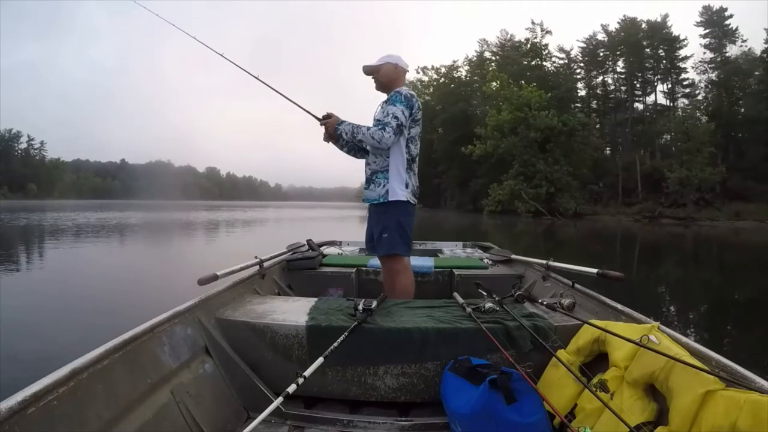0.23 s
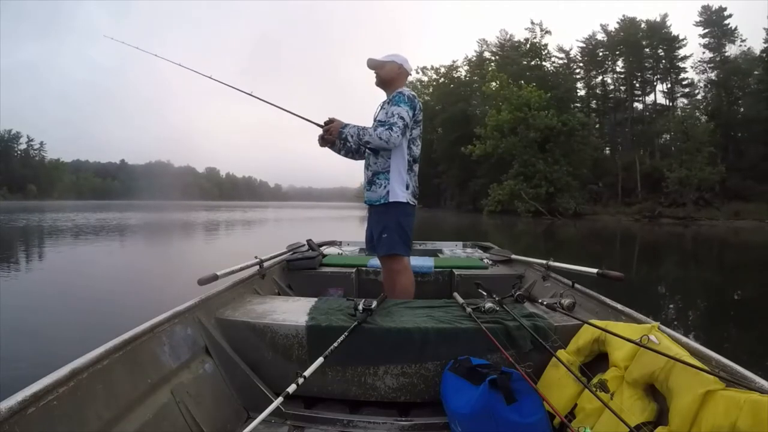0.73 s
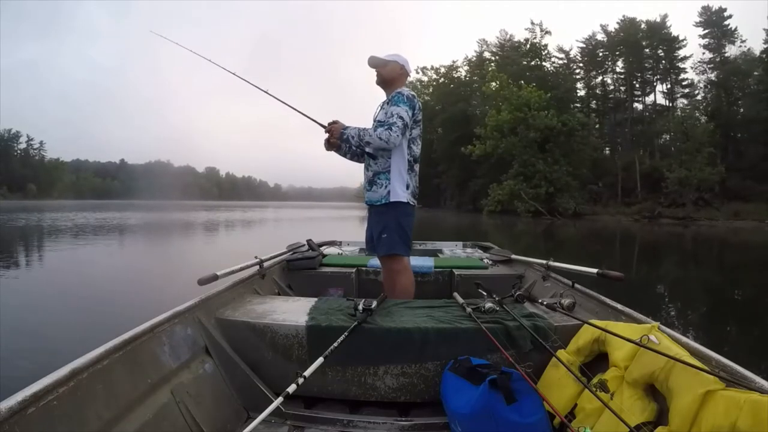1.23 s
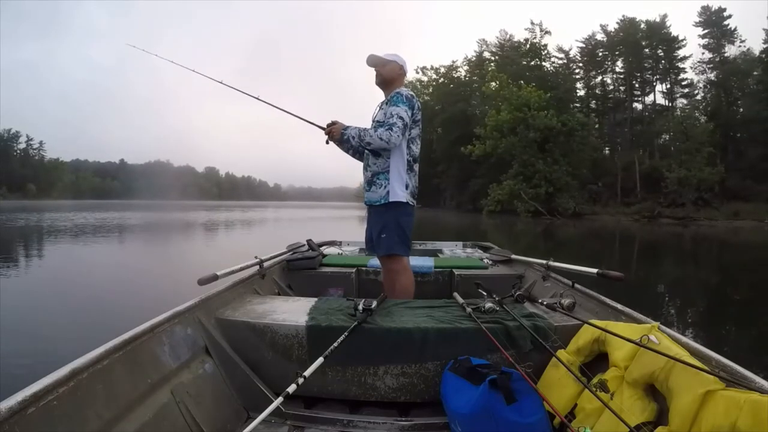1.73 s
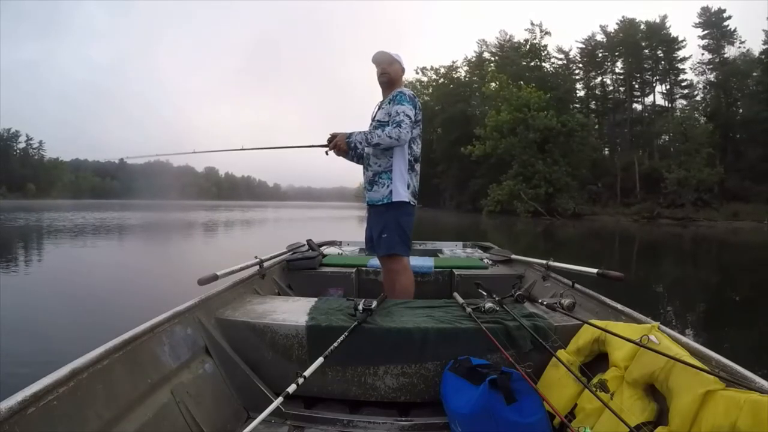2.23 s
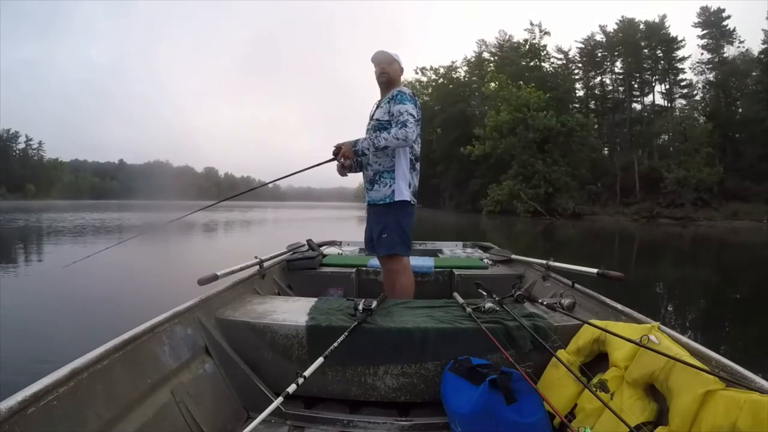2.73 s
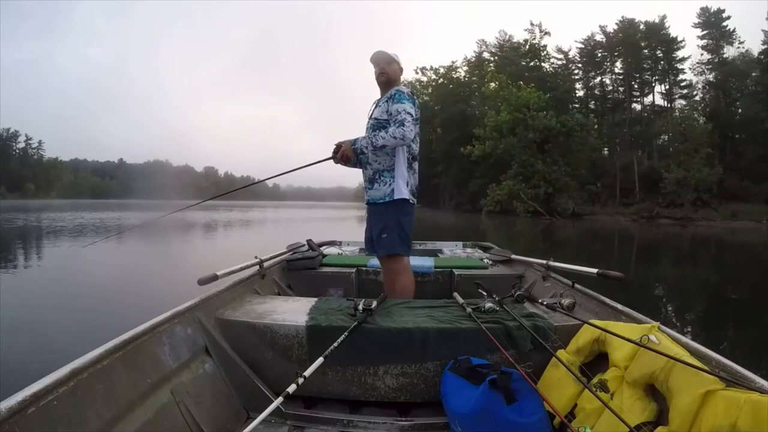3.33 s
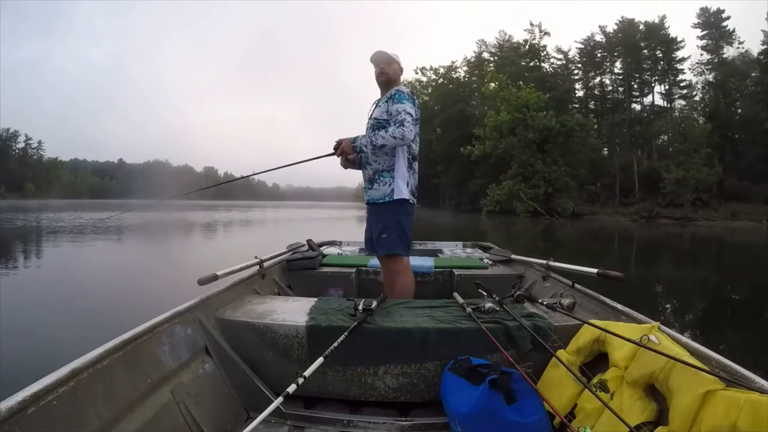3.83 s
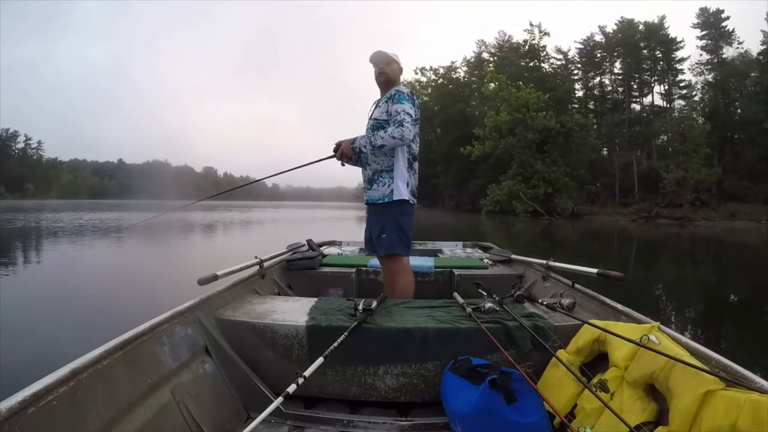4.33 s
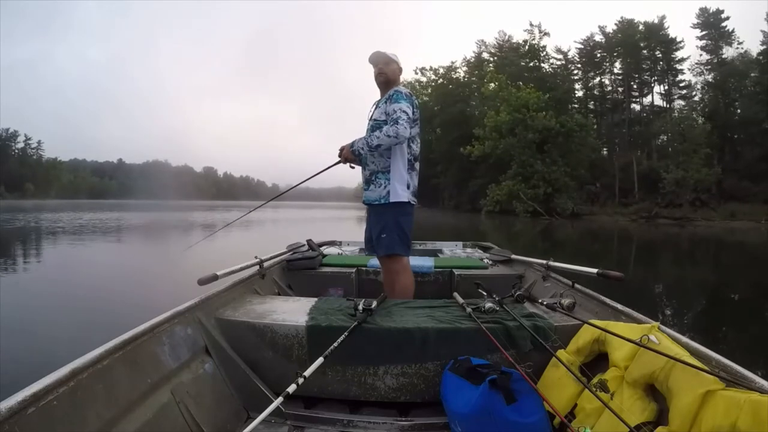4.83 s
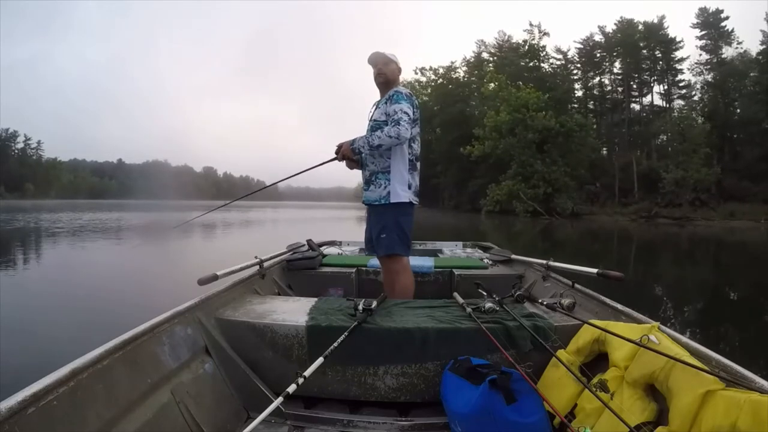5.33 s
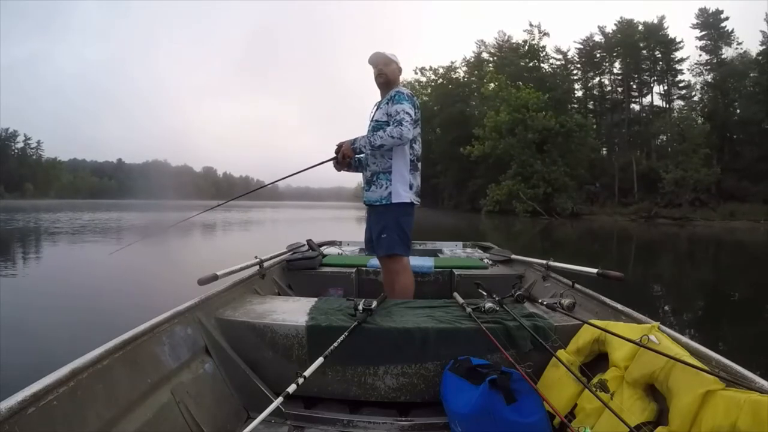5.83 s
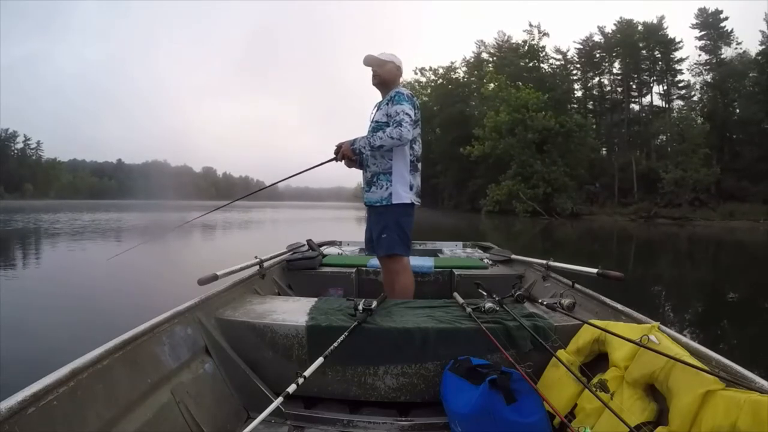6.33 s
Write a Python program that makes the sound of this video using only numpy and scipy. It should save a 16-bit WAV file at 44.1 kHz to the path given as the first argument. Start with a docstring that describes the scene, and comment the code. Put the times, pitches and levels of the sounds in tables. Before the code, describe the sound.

A fishing reel snaps shut with a sharp metallic clack, then small songbirds whistle and chip over steadily trilling insects and a low distant hum.

```python
"""A calm, misty lake heard from a small metal boat. A fishing reel snaps shut as struck modes and noise cracks,
and later ticks faintly. Songbirds on the shore give gliding tones: falling whistles, frequency-modulated buzzy
notes and rising chips. Insects in the trees trill as pulsed tones with echoes. Behind them lie a far low hum of
resonant noise, the soft wash of the open air as coloured noise, and faint steady treble tones."""
import sys
import numpy as np
from scipy import signal
from scipy.fft import rfft, irfft, next_fast_len
from scipy.io import wavfile
from scipy.ndimage import uniform_filter1d

SR = 44100
rng = np.random.default_rng(int(sys.argv[2]) if len(sys.argv) > 2 else 0)


def dump_mix(stems):
    """Bounce the given channels to the path in sys.argv[1] as a 16-bit WAV at rate SR."""
    frames = np.atleast_2d(stems).T  # one column per channel
    limited = np.clip(frames, -1, 1)  # hard clip at full scale
    pcm = np.round(limited * 32767).astype(np.int16)
    wavfile.write(sys.argv[1], SR, pcm)


N = 290178
T = np.arange(N) / SR
SIZE = next_fast_len(N, real=True)
FREQS = np.maximum(np.arange(SIZE // 2 + 1) * SR / SIZE, 1)


def from_db(db):
    """Level to amplitude: 20 dB is a factor of ten."""
    return 10 ** (np.asarray(db) / 20)


def rms_one(x):
    """Normalization: scale a signal to unit rms."""
    return x / np.sqrt(np.mean(x ** 2) + 1e-20)


def across_hz(points):
    """Spectral interpolation: a table read at every frequency, on a logarithmic axis."""
    hz, value = np.transpose(points)
    return np.interp(np.log(FREQS), np.log(hz), value)


def pan(left_db):
    """Interaural level difference: gains of the left and right side."""
    return from_db(np.array([[.5], [-.5]]) * left_db)


def drift(corner_hz):
    """Low-passed noise: slow chance with unit spread, drawn at every 32nd sample."""
    count = N // 32 + 2
    hz = np.arange(count // 2 + 1) * SR / 32 / count
    spectrum = rfft(rng.standard_normal(count)) / (1 + (hz / corner_hz) ** 2)
    slow = rms_one(irfft(spectrum, count))
    return np.interp(np.arange(N) / 32, np.arange(count), slow)


def stereo_noise(gain, alike, right_lag_s=0):
    """Partial coherence: a shared and an opposed noise mixed to a given correlation, colour and lag."""
    mid, side = rfft(rng.standard_normal((2, SIZE)))
    alike = np.clip(alike, -.98, .98)
    shared = np.sqrt((1 + alike) / 2) * mid
    opposed = np.sqrt((1 - alike) / 2) * side
    pair = shared + opposed * [[1], [-1]]
    lag = np.exp(-2j * np.pi * FREQS * np.array([[0], [right_lag_s]]))
    return irfft(gain * pair * lag, SIZE)[:, :N]


def resonance(hz, width_hz):
    """Resonance: a second-order peak passed twice for steep skirts, about width_hz wide at -3 dB."""
    return 1 / (1 + ((FREQS ** 2 - hz ** 2) / (FREQS * width_hz * np.pi / 2)) ** 2)


def scatter(x, t60, gap):
    """Diffuse reflection: after a gap, dense echoes decay 60 dB in t60 seconds, different on each side."""
    tail = rng.standard_normal((2, SR)) * from_db(-60 * T[:SR] / t60) * (T[:SR] > gap)
    tail /= np.sqrt(np.sum(tail ** 2, axis=1, keepdims=True))
    return signal.fftconvolve(np.broadcast_to(x, (2, N)), tail, axes=1)[:, :N]


def swaying(x, t60, gap, count=5):
    """Time-varying reflection: paths off moving foliage take turns at constant power and shift the colour."""
    shares = np.array([drift(7.4) for _ in range(count)])
    shares /= np.sqrt(np.sum(shares ** 2, axis=0))
    return sum(scatter(x * share, t60, gap) for share in shares)


def tone(hz):
    """Phase accumulation: a sine of unit rms that follows a pitch."""
    return np.sqrt(2) * np.sin(2 * np.pi * np.cumsum(hz) / SR)


# contacts of the reel's bail and gears: start_s, relative level_db, left_minus_right_db,
# brightness_db_per_octave of the ring about 4 kHz, direction (sign only: + blow, - rebound)
CONTACTS = [(0.04483, -20, 3.3, 7.8, 0.92), (0.04652, 3, 1.1, -2, 1), (0.04808, -3.0, -3.3, 3, 1),
            (0.04949, -3.5, -7, 6.5, -0.92), (0.05173, -12.5, -5.6, 4, 0.9), (0.05784, -14.5, -4, -4.5, 1),
            (0.06333, -22, 1.5, -1, 0.87), (0.201, -39, 0, 2, 1), (0.215, -40, 0, 6, 1),
            (0.231, -39, -2, 4, 1), (0.275, -40, 0, 3, 1), (3.68, -35.5, 0, 2, 0.94), (3.729, -43, 0, 4, 1)]
# vibration modes of the reel: frequency_hz, relative level_db, left_minus_right_db
REEL_MODES = [(454, -46, -6), (820, -42.5, -8), (1205, -36, 3), (1585, -32.5, 2), (1925, -34.7, 0.1),
              (2350, -34, 7), (2980, -25, 3), (3150, -47, -2.6), (3260, -37.5, 6), (3670, -28, -2.1),
              (3900, -40, 0.4), (4435, -27, 0.6), (4630, -33.5, 1.0), (4920, -27.5, 2.1), (5200, -36, 4.3),
              (5710, -23.8, -5.1), (6300, -34, 2.0), (6820, -24.5, 3.5), (7004, -22.9, -9.6),
              (7070, -19.5, -7), (7620, -27.5, 2.2), (7926, -26, -4), (8100, -30, -0.2), (9150, -33.5, -1),
              (10075, -44, -0.4), (11250, -50, 3.3), (12160, -43, 9)]
# noise spectrum of each crack: frequency_hz, relative level_db
CRACK_SPECTRUM = [(150, -28), (500, -18), (1200, -15), (2300, 5.5), (3500, 3), (7800, 8.5), (8800, -11),
                  (15000, -13)]


def reel(ring_db=0.1, ring_t60=0.022, crack_db=-20.0, crack_t60=0.0058, hull_db=-17.0, hull_t60=0.066):
    """Modal synthesis: each contact cracks and excites the reel's damped modes, and the hull throws it back."""
    t = T[:SR // 8]
    hz, mode_db, mode_left_db = np.transpose(REEL_MODES)
    # low modes ring longer than the 4 kHz decay time; neighbours swing in opposite directions
    t60 = ring_t60 * (4000 / hz) ** 0.3
    signs = (-1) ** np.arange(len(hz))
    ring, burst = np.zeros((2, 2, N))
    for s, db, left_db, brightness_db, direction in CONTACTS:
        start = int(s * SR) + 1
        span = slice(start, start + len(t))
        age = t + start / SR - s  # the contact may fall between two samples
        struck_db = mode_db + brightness_db * np.log2(hz / 4000)
        decay = from_db(struck_db[:, None] - 60 * age / t60[:, None])
        swing = np.sign(direction) * signs[:, None] * np.sin(2 * np.pi * hz[:, None] * age)
        ring[:, span] += from_db(db) * pan(left_db + mode_left_db) @ (decay * swing)
        burst[:, span] += from_db(db - 60 * age / crack_t60) * pan(left_db)
    crack = burst * rms_one(stereo_noise(from_db(across_hz(CRACK_SPECTRUM)), alike=0.25))
    # so small a body radiates no bass
    high_pass = signal.butter(2, 400, "high", fs=SR, output="sos")
    snap = signal.sosfilt(high_pass, from_db(ring_db) * ring + from_db(crack_db) * crack)
    return snap + from_db(hull_db) * scatter(snap, t60=hull_t60, gap=0.0012)


# long whistles: left_minus_right_db, lower_voice_db relative to the upper, tremble (0-1),
# course [(time_s, upper pitch_hz, relative level_db), ..]
WHISTLES = [(-12, -17, 1, [(1.025, 3030, -70), (1.06, 3350, -65), (1.11, 3640, -59.5), (1.15, 3660, -63),
            (1.215, 3660, -65), (1.23, 3690, -74)]), (-7, -27, 0.023, [(1.17, 3700, -72), (1.21, 3705, -63),
            (1.24, 3700, -69), (1.28, 3710, -65), (1.35, 3695, -75), (1.37, 3670, -72)]),
            (11, -17, 0, [(1.705, 2650, -72), (1.73, 3170, -62), (1.752, 3400, -67), (1.785, 3375, -67),
            (1.805, 3325, -64), (1.865, 3290, -55.5), (1.9, 3230, -57), (1.917, 3120, -59),
            (1.932, 3195, -53), (1.96, 3165, -55), (1.976, 3095, -61), (2.008, 3015, -57),
            (2.04, 3025, -60), (2.065, 2850, -73), (2.095, 2520, -72)]), (5, -3, 0.15, [(3.93, 3300, -76),
            (3.955, 3500, -68), (3.985, 3420, -71), (4.025, 3500, -72), (4.06, 3380, -73),
            (4.09, 3380, -78)]), (13, -8, 0.079, [(4.045, 3400, -74), (4.088, 3380, -67.5),
            (4.115, 3285, -63), (4.18, 3255, -61), (4.203, 3180, -67), (4.225, 3135, -64),
            (4.28, 3010, -61.5), (4.31, 2985, -68), (4.335, 2960, -78)]),
            (15, -16, 0.2, [(4.497, 2620, -67), (4.512, 2830, -65), (4.53, 2930, -69), (4.543, 3070, -59),
            (4.558, 3170, -62.5), (4.6, 3160, -60), (4.625, 3110, -64), (4.655, 2990, -67)])]


def whistles(level_db=-2.5, tremble_hz=34, tremble_depth_hz=80, pitch_jitter=.002, flutter_db=1.6,
             lower_voice_ratio=0.748):
    """Two-source voicing: both sides of the throat glide in a fixed ratio; some whistles tremble in pitch."""
    out = np.zeros((2, N))
    shake = np.sin(2 * np.pi * tremble_hz * T) + .4 * drift(90)
    waver = 1 + pitch_jitter * drift(60)
    flutter = flutter_db * drift(40)
    for left_db, lower_db, tremble, course in WHISTLES:
        s, hz, db = np.transpose(course)
        on = (T > s[0]) & (T < s[-1])
        t = T[on]
        pitch = np.interp(t, s, hz) * waver[on] + tremble * tremble_depth_hz * shake[on]
        fade = np.clip(np.minimum(t - s[0], s[-1] - t) / .006, 0, 1)
        voices = tone(pitch) + from_db(lower_db) * tone(lower_voice_ratio * pitch)
        loudness = from_db(level_db + np.interp(t, s, db) + flutter[on])
        out[:, on] += voices * fade * loudness * pan(left_db)
    return out


def note_shape(t, length, top_hz, scoop_s, fall_hz, scoop_hz=584, fall_power=1.55, attack_share=0.19,
               release_s=0.014):
    """Pitch and amplitude contours: scoop up, then fall ever faster; attack, hold and quick release."""
    scoop = np.maximum(1 - t / max(scoop_s, 1e-6), 0) ** 2
    hz = top_hz - scoop_hz * scoop - fall_hz * (t / length) ** fall_power
    envelope = np.clip(np.minimum(t / (attack_share * length), (length - t) / release_s), 0, 1)
    return hz, envelope


# short song notes: start_s, length_s, top_pitch_hz, scoop_time_s, fall_hz, relative level_db,
# buzz (0-1), left_minus_right_db
NOTES = [(0.69, 0.06, 3350, 0.0048, 30, -66, 0.15, 0), (0.76, 0.059, 3360, 0, 20, -67, 0.15, 0),
         (0.821, 0.049, 3260, 0.01, 0, -64, 0.2, 4), (1.4, 0.095, 2520, 0.005, 30, -67, 0, -5),
         (1.471, 0.11, 3740, 0.038, 36, -60, 1, -12), (1.571, 0.059, 2590, 0, 20, -63.5, 0.24, -10),
         (1.62, 0.097, 3720, 0.038, 30, -59, 1, -12), (1.722, 0.094, 2590, 0.004, 48, -67, 0.5, -10),
         (1.768, .1, 3670, 0.035, 60, -63, 0.96, -15), (2.2, 0.075, 3040, 0.011, 20, -66, .1, 0),
         (2.69, .08, 3480, 0.05, 0, -64.5, 0.4, -1), (2.85, .13, 3330, 0, 60, -73, 0.3, 0),
         (4.615, 0.052, 3080, 0.0045, 109.5, -66, 0.8, 9), (4.663, 0.055, 2800, 0.0035, 50, -65, 0.8, 12)]


def notes(level_db=-4.5, buzz_hz=105, buzz_depth_hz=115, flutter_db=1.0):
    """Frequency modulation: short contoured notes, some shaken fast enough in pitch to buzz."""
    out = np.zeros((2, N))
    buzz_rate = buzz_hz * (1 + .2 * drift(40))
    shake = np.sin(2 * np.pi * np.cumsum(buzz_rate) / SR) + .3 * drift(120)
    flutter = from_db(flutter_db * drift(50))
    for s, length, top_hz, scoop_s, fall_hz, db, buzz, left_db in NOTES:
        on = (T > s) & (T < s + length)
        hz, envelope = note_shape(T[on] - s, length, top_hz, scoop_s, fall_hz)
        voice = tone(hz + buzz_depth_hz * buzz * shake[on])
        out[:, on] += voice * from_db(level_db + db) * envelope * flutter[on] * pan(left_db)
    return out


# quick rising chips: middle_s, middle_pitch_hz, relative peak level_db, sweep_hz_per_s
CHIPS = [(.829, 3100, -57, 75000), (0.898, 3110, -55, 100000), (0.981, 3030, -57, 50000),
         (1.69, 3100, -54, 150000), (2.193, 3400, -55, 48000), (2.264, 3200, -57, 70000),
         (2.36, 3130, -57, 65000), (3.234, 3250, -55.5, 52000), (3.324, 3100, -60.5, 52000),
         (5.589, 3350, -57, 42000), (5.654, 3120, -56, 85000), (5.745, 3200, -54.5, 120000)]


def chips(level_db=-4.5, span_hz=245, left_db=12):
    """Linear chirp: each chip sweeps up through the same Gaussian span, so the faster ones are shorter."""
    out = np.zeros((2, N))
    for s, hz, db, sweep in CHIPS:
        rise = sweep * (T - s)
        on = abs(rise) < 4 * span_hz
        envelope = np.exp(-(rise[on] / span_hz) ** 2 / 2)
        out[:, on] += tone(hz + rise[on]) * from_db(level_db + db) * envelope * pan(left_db)
    return out


def songbirds(leaves_db=-12, woods_db=-6.0, woods_t60=0.87):
    """Direct and reverberant sound: song crosses the water, leaves blur it a little and the woods answer."""
    song = whistles() + notes() + chips()
    leaves = swaying(song, t60=.14, gap=.002, count=3)
    woods = swaying(song, t60=woods_t60, gap=0.026, count=3)
    return song + from_db(leaves_db) * leaves + from_db(woods_db) * woods


# trilling insects: mean wing pitch_hz, mean stroke_rate_hz, relative level_db
INSECTS = [(5335, 41.0, -70.5), (5550, 41.0, -70), (5470, 40.4, -77), (5700, 41.7, -77), (5150, 46, -76)]


def insects(throb=0.74, glide=0.0095, jitter=.005, left_db=-3.5, trees_db=-2, waver_db=0.3, level_db=-0.76):
    """Amplitude modulation: each wing stroke is a tone that sags in pitch; tree echoes fill the gaps."""
    trill = np.zeros(N)
    wander = np.cumsum(drift(1.3)) / SR  # the insects' stroke rates wander together
    for hz, strokes_hz, db in INSECTS:
        phase = 2 * np.pi * (strokes_hz * T + .12 * wander)
        pitch = hz * (1 - glide * np.sin(phase) + jitter * drift(79.7))
        wing = np.exp(throb * np.cos(phase)) * np.sin(2 * np.pi * np.cumsum(pitch) / SR)
        trill += rms_one(wing) * from_db(db + waver_db * drift(1.4))
    heard = trill + from_db(trees_db) * swaying(trill, t60=0.24, gap=0.0023)
    return heard * from_db(level_db) * pan(left_db)


# resonances of the far hum: frequency_hz, width_hz, relative level_db, left_right_correlation (-1 to 1)
HUM_MODES = [(150.7, 16.6, -3.5, 1), (158.1, 18, -0.5, 0.86), (194, 103, -8, .35), (224, 31, -7.5, 0.73)]
# swell of the hum: time_s, relative level_db
HUM_SWELL = [(0.0, -50.5), (0.75, -51), (0.95, -45), (1.2, -52), (1.3, -44), (1.5, -54.5), (1.6, -44.5),
             (1.79, -53), (2.19, -45.5), (2.54, -54), (2.72, -48), (2.9, -49), (3.2, -47), (3.69, -47),
             (4.42, -51), (4.68, -47), (4.78, -56), (4.95, -50), (5.85, -52), (5.97, -45.5), (6.08, -50.5),
             (6.58, -52)]


def hum(level_db=-1.5, left_db=-1.5, smooth_s=0.19, low_cut_hz=122):
    """Resonant filtering: noise in a few narrow bands forms a far rumble whose level swells and sinks."""
    low_cut = 1 / np.sqrt(1 + (low_cut_hz / FREQS) ** 20)
    rumble = np.zeros((2, N))
    for hz, width_hz, db, alike in HUM_MODES:
        band = stereo_noise(low_cut * resonance(hz, width_hz), alike)
        rumble += from_db(db) * rms_one(band)
    # even out the noise's own slow level changes before the swell is laid on
    power = np.abs(signal.hilbert(rumble.mean(axis=0), SIZE)[:N]) ** 2 / 2
    steady = rumble / np.sqrt(uniform_filter1d(power, int(smooth_s * SR)))
    swell_db = np.interp(T, *np.transpose(HUM_SWELL))
    return steady * from_db(swell_db + level_db) * pan(left_db)


# spectrum of the open air: frequency_hz, mean level_db_per_hz
AIR_SPECTRUM = [(25, -100), (100, -91), (118, -101), (150, -71.5), (280, -77), (400, -80), (900, -81.5),
                (1500, -89), (2500, -95), (4300, -100.5), (6500, -98), (10000, -100), (12500, -107),
                (15000, -115), (15600, -135)]
# how alike the two sides hear the air: frequency_hz, correlation (-1 to 1)
AIR_CORRELATION = [(60, -0.25), (200, 0.18), (350, -0.44), (600, -0.72), (900, -0.82), (1400, -0.58),
                   (2200, -0.35), (3000, 0.1), (4200, 0.52), (6000, -0.32), (15000, 0.16)]
# sideways tilt of the air: frequency_hz, left_minus_right_db
AIR_TILT = [(100, -0.5), (300, -1), (600, 0), (4500, 0), (7600, -1.5), (8200, -0.5), (10000, -2.5),
            (12000, 0)]


def air(right_lag_s=.00003, swell_db=0.56):
    """Superposition: distant wind and water merge into coloured noise, slightly later on the right."""
    # density per Hz to the gain of white noise that spans SR / 2
    gain = from_db(across_hz(AIR_SPECTRUM)) * np.sqrt(SR / 2) * pan(across_hz(AIR_TILT))
    wash = stereo_noise(gain, across_hz(AIR_CORRELATION), right_lag_s)
    return wash * from_db(swell_db * drift(4.0))


# thin steady whines: pitch_hz, rms level_db
WHINES = [(11747, -87), (12252, -92)]


def whine():
    """Pure tones: faint steady sines high in the treble."""
    return sum(np.sqrt(2) * from_db(db) * np.sin(2 * np.pi * hz * T) for hz, db in WHINES)


def scene():
    """Linear superposition: the reel, the shore and the lake add together."""
    return reel() + songbirds() + insects() + hum() + air() + whine()


def record(dry, ceiling=.5, cutoff_hz=16000):
    """Saturation and band limiting: peaks are rounded and the top is cut steeply."""
    rounded = ceiling * np.tanh(dry / ceiling)
    low_pass = signal.ellip(10, .1, 70, cutoff_hz, fs=SR, output="sos")
    return signal.sosfilt(low_pass, rounded)


dry = scene()
out = record(dry)
dump_mix(out)
```